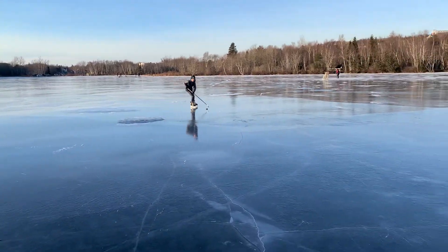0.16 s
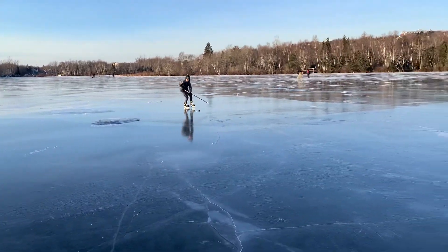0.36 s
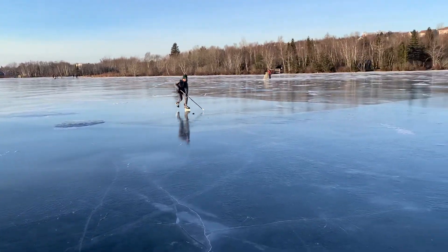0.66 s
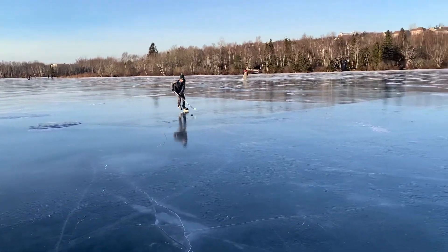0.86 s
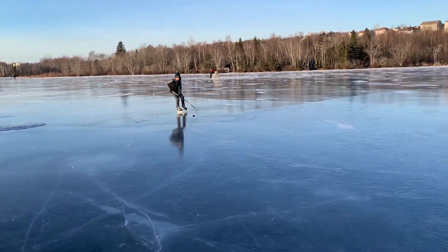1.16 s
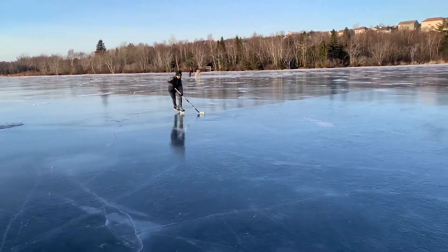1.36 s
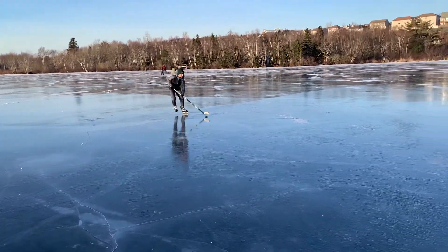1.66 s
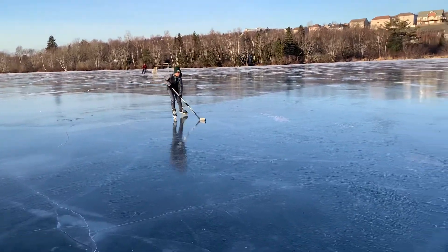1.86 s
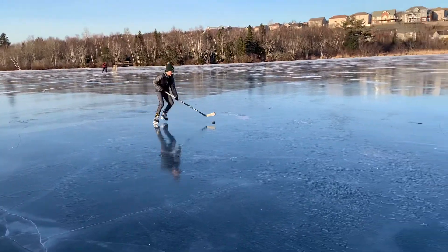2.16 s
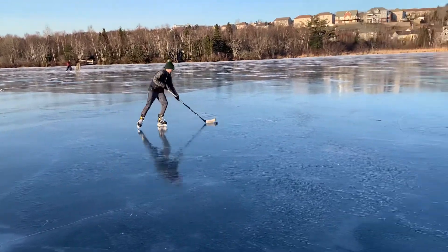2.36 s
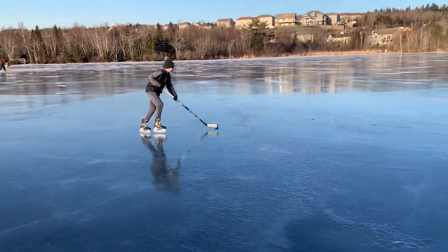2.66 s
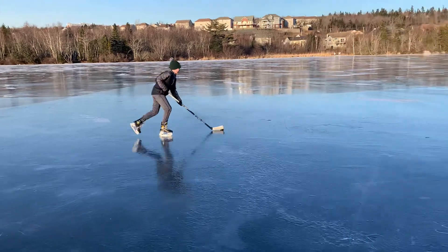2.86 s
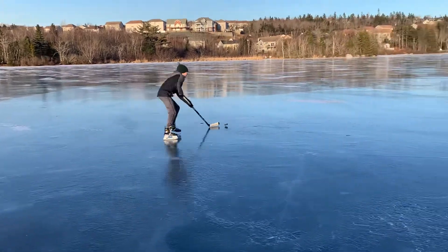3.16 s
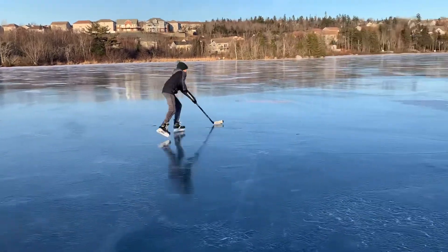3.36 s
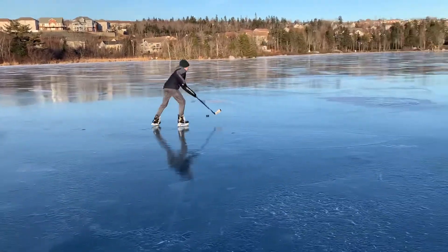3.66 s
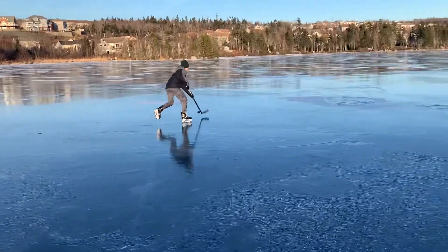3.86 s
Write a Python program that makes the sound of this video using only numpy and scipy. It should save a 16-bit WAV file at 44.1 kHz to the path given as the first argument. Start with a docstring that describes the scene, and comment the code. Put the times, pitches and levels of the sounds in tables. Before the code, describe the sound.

Ice skating on a frozen lake: quiet scraping at first, then stronger strokes, chipping snaps and hard hockey stick knocks as the skater nears; ice booms softly and light wind rumbles at the handheld microphone.

```python
"""A skater with a hockey stick passes close by on a frozen lake, under faint air and a light wind.
At first blades rasp and hiss stroke by stroke (fractures over shaving noise) and two early knocks sound.
From about 1.5 s the wind is stronger, and stick and puck knock in clusters (noise bursts, ringing modes).
The stick drags now and then in gritty slips; a strong knock near 2.8 s precedes the heaviest at 3.16 s.
Throughout, blades chip the ice in short snaps, and the sheet rumbles and booms in low sagging tones."""
import sys
import numpy as np
from scipy import signal
from scipy.fft import rfft, irfft
from scipy.io import wavfile
from scipy.ndimage import uniform_filter1d

SR = 44100
rng = np.random.default_rng(int(sys.argv[2]) if len(sys.argv) > 2 else 0)


def digitize_waveform(pressure):
    """Quantize a signal to 16-bit integers and store it at the path in sys.argv[1].

    Rows of a 2-D input are taken as channels; values are limited to [-1, 1].
    """
    field = np.atleast_2d(pressure).T
    bounded = np.clip(field, -1, 1)
    quanta = np.round(bounded * 32767).astype(np.int16)
    wavfile.write(sys.argv[1], SR, quanta)


N = 176400

# light wind: t/s, level/dB
WIND_LEVEL = [(0, -65.5), (.8, -65.5), (1.4, -55), (2.4, -55), (4, -54)]
# spectra of wind and open air: f/Hz, level/dB per Hz
WIND_SPECTRUM = [(10, -25), (25, -17), (40, -12), (55, 0), (85, -4.5), (130, -1), (250, -14.5), (600, -53),
                 (16000, -114)]
AIR_SPECTRUM = [(50, 16.5), (300, 8), (750, -6), (2000, -14), (4000, -9), (10000, 0), (16000, -5)]
AIR_DB = -65.5

# ice sheet booming under the skater's weight: t/s, level/dB, starting pitch f/Hz
BOOMS = [(0.044, -19, 133), (0.514, -26, 212), (0.808, -26, 134), (0.969, -24, 139), (1.36, -19, 195),
         (1.605, -35, 150), (1.884, -15, 168), (2.517, -19.5, 219), (2.571, -18, 173.6), (2.788, -12, 150),
         (3.224, -11, 150), (3.229, -20, 376), (3.395, -20, 156), (3.664, -20, 150)]
BOOM_RISE_S, BOOM_SAG_PER_S = 0.012, 2.6

# small clicks of blades chipping the ice: t/s, body level/dB, treble level/dB
CHIPS = [(0.076, -22.5, -22.5), (.321, -31.5, -25), (.526, -23, -23), (.706, -18, -18), (.783, -27.5, -36),
         (0.7963, -31, -36), (.976, -45, -34), (0.995, -21, -23), (1.053, -18.5, -17.5),
         (1.1222, -18.5, -18.5), (1.364, -12, -11.5), (1.389, -13.5, -15), (1.403, -16.5, -33),
         (1.437, -14, -14.5), (1.495, -16.5, -23), (1.5701, -10, -15.5), (1.65, -15.5, -19.5),
         (1.682, -14, -22), (1.711, -22, -20.5), (1.795, -20, -31), (1.821, -11, -23), (1.982, -20.5, -50),
         (2.081, -25.5, -37), (2.429, -18, -39), (2.566, -28, -34), (2.645, -36, -20), (2.922, -15.5, -29),
         (3.045, -11, -15), (3.14, -16.5, -24), (3.332, -22, -41), (3.494, -25, -22), (3.623, -20.5, -25),
         (3.683, -7, -25), (3.701, -18.5, -26), (3.724, -14, -20.5), (3.803, -45, -18.5), (3.848, -27, -23),
         (3.915, -16.5, -47), (3.9245, -12, -39)]
# spectra of a flake of ice and of a sharp crack: f/Hz, level/dB per Hz
CHIP_SPECTRUM = [(60, -4), (400, -5.5), (750, -0.5), (1200, 3.5), (1700, 1.5), (2500, 5.5), (3300, -3),
                 (5000, -8.5), (9000, -32), (16000, -60)]
CRACK_SPECTRUM = [(200, -88), (2500, -23.5), (5000, 1.5), (7000, 2.5), (9500, 3.5), (12000, -1),
                  (14000, -3), (16500, -14)]
CHIP_DECAY_S, CHIP_SNAP_DB = 0.0049, -8  # snap: first click against the crumbling that follows

# stick blade dragging over the ice: peak t/s, rise/s, fall/s, level/dB
DRAGS = [(1.475, 0.031, 0.024, -50), (1.54, 0.0058, 0.022, -53), (1.915, 0.069, 0.0073, -42.5),
         (2.77, 0.068, 0.14, -45), (3.325, 0.079, 0.068, -37)]
# spectrum of the drag: f/Hz, level/dB per Hz
DRAG_SPECTRUM = [(100, -18), (450, -6.5), (750, -3.5), (1020, -2.5), (1190, 3.5), (1350, 2), (1600, -5),
                 (2200, -4.5), (3000, -15), (5000, -28), (16000, -75)]
SLIPS_PER_S, SLIP_DB, SLIP_LAG_S = 520, -3.5, 0.00402

# stick and puck knocks: t/s, ice thump level/dB, thud level/dB, thud pitch f/Hz, stick ring level/dB,
# high ring level/dB, crack level/dB, ring length (share), bass lag/s
KNOCKS = [(0.25, -31, -10.5, 2110, -38, -21, -15, 0.18, 0.00091),
          (0.254, -35, -14.5, 1920, -21.5, -34, -25, 1.3, .001),
          (0.488, -48, -17.5, 1550, -32, -40, -40, 0.19, 0.00258),
          (1.5391, -30, -8, 1370, -8, -19.5, -22, 1.8, 0.0017),
          (1.5535, -38, -17, 1390, -17, -21, -27, 0.85, 0.0017),
          (1.582, -34, -10.5, 1370, -9, -14, -24, 0.56, 0.0011),
          (1.6128, -11, 3.5, 870, -2.5, -37, 2.5, 0.56, .002),
          (1.8604, -43, -4.5, 1670, 1.5, 2, -20, 0.53, 0.00102),
          (1.897, -22, -14, 1400, -2.5, -5, -13.5, 0.4, 0.0022),
          (1.8999, -22, -3, 970, -2, -10, -33, 0.36, 0.0019),
          (2.321, -37, 0.5, 1200, -3.5, -10.5, -11.5, 0.63, 0.0022),
          (2.331, -22, -14, 960, -26, -20, -20, 0.59, 0.0023),
          (2.4918, -46, -8.5, 1640, -38, -24, -29, 0.37, 0.0046),
          (2.67, -10.5, -1.5, 1580, -8, -20, -19, 0.35, .004),
          (2.73, -29, -2.5, 2030, -2.5, -7.5, -1, 1.4, 0.0017),
          (2.75, -13.5, -8.5, 1150, -30, -26, -21, 0.45, 0.0084),
          (2.7922, -15, 7.5, 1360, 3, -10, -5.5, 0.37, 0.00284),
          (2.808, -20, -5.5, 1090, -10.5, -31, -32, 0.65, 0.0025),
          (2.8689, -26, 5, 1400, -5, -14.5, -18.5, 0.096, .003),
          (3.1615, -22, 4.5, 1370, 7, 8.5, -8.5, .6, 0.0022),
          (3.172, -19, -15, 1510, -5.5, -4.5, -29, .4, 0.0014),
          (3.218, -18, -8, 1230, -25, -36, -31, 0.37, 0.012),
          (3.4764, -34, -18, 1710, -16, -39, -33, 0.28, 0.0019),
          (3.6612, -24, -7, 1470, -20, -27, -12.5, 0.37, 0.00389),
          (3.6814, -6.5, -9.5, 790, -19, -32, -13, .4, 0.0037)]
# modes of the stick blade: f/Hz, level/dB, t60/s before the ring length share
STICK_MODES = [(412, -14.5, 0.055), (534, -26.5, 0.062), (1062, -9.5, 0.11), (1208, -6.5, 0.084),
               (1235, -15, 0.039), (1534, -3.5, 0.047), (1753, -7, 0.063), (1964, -1.5, 0.032),
               (2090, 0, 0.033), (2440, 10.5, 0.011), (2953, 2.5, 0.055), (3604, 7.5, 0.029),
               (3860, 14, 0.01), (4676, -5, 0.018)]
HIGH_RING_HZ, MODE_SCATTER_DB, MODE_DETUNE = 2400, 3.5, 0.011
# spectrum of the puck's thud: f (multiple of its pitch), level/dB per Hz
THUD_SPECTRUM = [(.05, -44), (.2, -14.5), (.33, -7), (.6, -4), (1, 2.5), (1.25, -1), (1.6, -6.5),
                 (2.8, -19), (6, -54), (14, -69)]
THUD_DECAY_S, THUD_RATTLE_DB = 0.0037, -3  # a freely ringing stick also rattles on the puck
THUMP_HZ, THUMP_RISE_S = 150, 0.0031  # each thump lands at 0.94 to 1.3 times this pitch
SNAP_DB, CRACK_DECAY_S, CRACK_TAIL_DECAY_S, CRACK_TAIL_DB = -21.5, 0.001, 0.00093, 5.5
BUZZ_DB, BUZZ_DECAY_S = -3.5, 0.0054  # the stick blade rattles against the ice after a blow
LEAD_S, LEAD_DB = 0.00194, -22.5  # part of a knock races ahead through the ice

# blade strokes: peak t/s, rise/s, fall/s, then deep grind, rasp, hiss and ice rumble level/dB
STROKES = [(.08, 0.078, 0.11, -66, -54, -66, -53.5), (0.534, 0.043, 0.051, -55, -53, -45.5, -60),
           (.77, 0.42, 0.15, -72, -59.5, -59.5, -68), (1.04, 0.098, 0.069, -59.5, -54, -48, -58.5),
           (1.37, 0.072, 0.029, -50, -54, -44.5, -58), (1.58, 0.24, 0.41, -51.5, -47, -65, -49),
           (1.888, 0.082, 0.082, -52, -46, -77, -52), (2.08, 0.19, 0.27, -85, -54, -98, -57),
           (2.299, 0.059, 0.071, -44.5, -41.5, -50.5, -52.5), (2.419, 0.036, 0.023, -52, -45, -52, -59.5),
           (2.54, 0.047, 0.052, -45.5, -41, -43, -47), (2.76, 0.13, 0.14, -45.5, -44, -49.5, -45),
           (3.02, 0.18, 0.092, -47, -50, -57, -54), (3.309, 0.15, 0.12, -49, -44, -48, -44.5),
           (3.48, 0.13, 0.044, -51.5, -48, -48, -53), (3.688, 0.029, 0.045, -39.5, -44, -54, -41.5),
           (3.90, 0.66, 0.12, -52.5, -53.5, -63, -60)]
# spectra of the four stroke layers: f/Hz, level/dB per Hz
GRIND_SPECTRUM = [(60, -2), (200, -18), (430, -8), (700, -3), (1020, 1.5), (1200, 5.5), (1400, -10.5),
                  (1650, -8), (2300, -2), (4000, -17.5), (8000, 1), (16000, -16)]
RASP_SPECTRUM = [(100, -15), (400, -18.5), (750, -8), (1100, -5), (1350, -7), (1620, 6), (1900, -9.5),
                 (2150, -3), (2450, 2.5), (2750, 6), (3300, -0.5), (4200, -5.5), (6500, -5.5), (9000, -73),
                 (16000, -67)]
HISS_SPECTRUM = [(500, -33), (2500, -17), (4500, 0), (6500, 3), (7700, -36), (8600, 7), (9700, 10),
                 (11500, 6.5), (13500, 4.5), (15500, -2), (16500, -13.5)]
RUMBLE_SPECTRUM = [(20, -28), (70, -3.5), (105, -19), (135, 0), (180, -2.5), (230, -5), (320, -13.5),
                   (500, -5), (1200, -62.5), (16000, -77)]
GRAINS_PER_S, GRAIN_SPREAD_DB = 1100, 5
PATCH_DB, PATCH_FRAMES, PATCH_BINS = 4, 22, 5
# the blade's resonance shifts with the load on its edge
BLADE_HZ, BLADE_WIDTH_HZ, BLADE_DRIFT, BLADE_DB = 1655, 128, .05, -9.5
CRACKLE_PER_S, CRACKLE_DB, CRACKLE_SPREAD_DB = 130, -3.5, 3  # coarse flakes, against the rasp
SWELL_DB, SWELL_HZ = 1.6, 7.6  # the skater's weight shifts on the edge

# bending waves: pitches below this come later, by half the bass lag two octaves down
BEND_HZ = 2176
SHORE_DB, SHORE_T60_S = -16, 0.062

# where the skater is: t/s, left minus right level/dB
PAN = [(0, 1.5), (1.202, 2), (1.6, -0.5), (2.2, 1), (2.8, -0.3), (3.3, 0.3), (4, -0.4)]
# microphone pair, phase: f/Hz, lead of the left (radians)
PORT_PHASE = [(0, 0), (100, 0), (170, .4), (220, 1), (260, 1.7), (300, 3.1), (345, 4.3), (430, 5.1),
              (520, 6.3), (600, 7.8), (700, 10), (850, 12.2), (1080, 15), (1200, 17.8), (1400, 19.8),
              (1750, 19.3), (1950, 21), (2250, 20.6), (2500, 22.3), (2900, 22.6), (3400, 25.3),
              (3750, 27.2), (4300, 27.4), (5000, 28.6), (5600, 29.6), (6300, 31.4), (6800, 31),
              (7400, 29.2), (8700, 28.2), (10400, 25.2), (11500, 25), (13000, 22.2), (14200, 21.7),
              (15100, 18.9), (22050, 18.9)]
# microphone pair, balance: f/Hz, left minus right level/dB
PORT_BALANCE = [(60, 0), (300, 0), (430, .5), (630, -7), (900, -2), (1250, 0), (1500, -3), (2100, -4),
                (2900, -2), (3200, 2), (3700, -3), (5300, -6), (7000, 0), (16000, 0)]
# how far diffuse sound differs between the pair: f/Hz, amplitude share (0 to 1)
APART = [(60, .03), (200, .2), (300, .75), (420, .35), (700, .4), (1100, .45), (1500, .3), (1900, .5),
         (2600, .3), (3500, .5), (6000, .55), (8500, .1), (12000, .35), (13500, .1), (16000, .3)]
# microphone colour: f/Hz, level/dB
MIC = [(200, -0.5), (290, 1), (400, 2), (560, 1), (770, -2.5), (980, 0), (1600, 0), (2100, 0.5),
       (2550, -1.5), (3200, -1), (4300, -1.5), (6500, -2.5), (13000, -3.5), (16000, -3)]
LOW_CUT_HZ, EDGE_HZ = 27, 16200


def amp(db):
    """Decibels to gain."""
    return 10 ** (np.asarray(db) / 20)


def evened(x):
    """Scales to an rms of one."""
    return x / np.sqrt(np.mean(x ** 2) + 1e-20)


def unit(x):
    """Scales to an energy of one."""
    return x / np.sqrt(np.sum(x ** 2) + 1e-20)


def read(points, hz):
    """Reads a table on a log-frequency axis."""
    f, value = np.transpose(points)
    return np.interp(np.log(hz + 1), np.log(f + 1), value)


def add(mix, s, sound):
    """Adds a sound into the mix at time s."""
    part = mix[round(s * SR):][:len(sound)]
    part += sound[:len(part)]


def colour(x, points, size=4096):
    """Causal (minimum-phase) filter with the given spectrum."""
    log_gain = np.log(amp(read(points, abs(np.fft.fftfreq(size, 1 / SR)))))
    taps = np.fft.ifft(np.exp(np.conj(signal.hilbert(log_gain)))).real[:size // 2]
    return signal.fftconvolve(x, taps)[:len(x)]


def wander(rate_hz):
    """Random drift of rms one, rolling off above the given rate."""
    hz = np.fft.rfftfreq(N, 1 / SR)
    return evened(irfft(rfft(rng.standard_normal(N)) / np.sqrt(1 + (hz / rate_hz) ** 4), N))


def burst(t, decay_s):
    """A dying puff of noise."""
    return unit(rng.standard_normal(len(t)) * np.exp(-t / decay_s))


def sparse_signs(per_s):
    """Random moments at the given mean rate, each pushing up or down."""
    return rng.choice([-1, 1], N) * (rng.random(N) < per_s / SR)


def dispersed(x, lag_s):
    """Bending waves in the ice sheet: delay grows with one over the root of frequency."""
    hz = np.fft.rfftfreq(len(x), 1 / SR)
    delay = lag_s * np.maximum(np.sqrt(BEND_HZ / np.maximum(hz, 20)) - 1, 0) / 2
    turns = np.cumsum(delay) * hz[1]
    return irfft(rfft(x) * np.exp(-2j * np.pi * turns), len(x))


def air():
    """The faint hush of the lake, as steady coloured noise."""
    return amp(AIR_DB) * evened(colour(rng.standard_normal(N), AIR_SPECTRUM))


def wind():
    """Low buffeting at the microphones, as bass noise with a fluttering level."""
    level_db = np.interp(np.arange(N) / SR, *np.transpose(WIND_LEVEL))
    level = amp(level_db + 1.5 * wander(rate_hz=14))
    return level * evened(colour(rng.standard_normal(N), WIND_SPECTRUM))


def booms(size=8000):
    """Each boom swells softly and sags in pitch, as the slower bending waves arrive last."""
    out, t = np.zeros(N), np.arange(size) / SR
    for s, db, hz in BOOMS:
        turns = np.cumsum(hz * np.exp(-BOOM_SAG_PER_S * t)) / SR + rng.random()
        swell = t * np.exp(-t / BOOM_RISE_S)
        add(out, s, amp(db) * unit(swell * np.sin(2 * np.pi * turns)))
    return out


def patchy(x):
    """Random patches in time and frequency make the scrape's colour uneven."""
    z = signal.stft(x, nperseg=512, noverlap=384)[2]
    field = uniform_filter1d(rng.standard_normal(z.shape), size=PATCH_BINS, axis=0)
    field = uniform_filter1d(field, size=PATCH_FRAMES, axis=1)
    return signal.istft(z * amp(PATCH_DB * evened(field)), nperseg=512, noverlap=384)[1][:N]


def scrape(spectrum, chatter, grain_db, chatter_db):
    """Tiny fractures under an edge over a fine shaving noise, their level moved by its chatter."""
    size = amp(GRAIN_SPREAD_DB * np.minimum(rng.exponential(1, N), 5))
    grains = size * sparse_signs(GRAINS_PER_S)
    drive = rng.standard_normal(N) + amp(grain_db) * evened(grains)
    return evened(colour(patchy(drive * amp(chatter_db * chatter)), spectrum))


def chips(size=3000):
    """Short snaps where a blade lands or breaks out a flake of ice."""
    out, t = np.zeros(N), np.arange(size) / SR
    snap = amp(CHIP_SNAP_DB) * (t == 0)
    for s, body_db, treble_db in CHIPS:
        body = colour(snap + burst(t, CHIP_DECAY_S), CHIP_SPECTRUM)
        treble = colour(snap + burst(t, decay_s=0.0054), CRACK_SPECTRUM)
        add(out, s, amp(body_db) * unit(body) + amp(treble_db) * unit(treble))
    return out


def drags(chatter):
    """The stick blade judders over the ice in uneven slips and sounds its main resonance."""
    t, power = np.arange(N) / SR, 0
    for peak, rise, fall, db in DRAGS:
        away = (t - peak) / np.where(t < peak, rise, fall)
        power = power + amp(db) ** 2 * np.exp(-away ** 2)
    slips = rng.uniform(0.59, 1, N) * sparse_signs(SLIPS_PER_S)
    grit = evened(dispersed(colour(slips, DRAG_SPECTRUM), SLIP_LAG_S))
    rub = scrape(DRAG_SPECTRUM, chatter, grain_db=3, chatter_db=3.5)
    return np.sqrt(power) * evened(rub + amp(SLIP_DB) * grit)


def stick_modes(t, length):
    """A struck stick blade rings in decaying modes, with levels and pitches scattered blow by blow."""
    hz, db, t60 = np.transpose(STICK_MODES)[:, :, None]
    scatter, detune, phase = rng.standard_normal((3, len(hz), 1))
    level = amp(db + MODE_SCATTER_DB * scatter - 60 * t / (t60 * max(length, .1)))
    modes = level * np.sin(2 * np.pi * (hz * (1 + MODE_DETUNE * detune) * t + phase))
    modes *= 1 - np.exp(-t / 0.0017)  # soft onset
    high = hz[:, 0] > HIGH_RING_HZ
    return modes[~high].sum(0), modes[high].sum(0)


def puck_thud(t, pitch_hz, length, lag_s):
    """The puck's click and rattle, coloured around its pitch and smeared by the ice."""
    hit = (t == 0) + min(length, 1) * amp(THUD_RATTLE_DB) * burst(t, THUD_DECAY_S)
    return dispersed(colour(hit, np.multiply(THUD_SPECTRUM, [pitch_hz, 1])), lag_s)


def knocks(size=6000):
    """Each blow cracks, thuds, rings the stick blade and thumps the ice sheet."""
    out, t = np.zeros(N), np.arange(size) / SR
    for s, thump_db, thud_db, thud_hz, ring_db, high_db, crack_db, length, lag_s in KNOCKS:
        low_ring, high_ring = stick_modes(t, length)
        thump_hz = THUMP_HZ * rng.uniform(0.94, 1.3)
        thump = t * np.exp(-t / THUMP_RISE_S) * np.sin(2 * np.pi * thump_hz * t)
        thud = puck_thud(t, thud_hz, length, lag_s)
        crack = amp(SNAP_DB) * (t == 0) + burst(t, CRACK_DECAY_S)
        crack = crack + amp(CRACK_TAIL_DB) * burst(t, CRACK_TAIL_DECAY_S)
        crack = colour(crack, CRACK_SPECTRUM)
        buzz = colour(burst(t, BUZZ_DECAY_S), CHIP_SPECTRUM)
        ring = unit(low_ring) + amp(BUZZ_DB) * unit(buzz)
        add(out, s, amp(thump_db) * unit(thump) + amp(thud_db) * unit(thud)
            + amp(crack_db) * unit(crack) + amp(ring_db) * unit(ring)
            + amp(high_db) * unit(high_ring))
    return out


def stroke_levels():
    """Each stroke swells and fades; gives the gains of grind, rasp, hiss and rumble."""
    t, power = np.arange(N) / SR, 0
    for peak, rise, fall, *db in STROKES:
        away = (t - peak) / np.where(t < peak, rise, fall)
        power = power + amp(db)[:, None] ** 2 / (1 + away ** 2 / 2.71) ** 5.1
    return np.sqrt(power)


def blade_ring():
    """Friction sounds a resonance of the blade that drifts in pitch."""
    hz = BLADE_HZ * (1 + BLADE_DRIFT * wander(rate_hz=5.2))
    turn = np.exp(2j * np.pi * np.cumsum(hz) / SR)
    r = np.exp(-np.pi * BLADE_WIDTH_HZ / SR)
    # shift the noise down, smooth it with a double pole, then shift it back up
    smooth = signal.lfilter([1], np.poly([r, r]), rng.standard_normal(N) / turn)
    return evened((turn * smooth).real)


def crackle():
    """Coarse flakes break away under the edge."""
    size = amp(CRACKLE_SPREAD_DB * np.minimum(rng.exponential(1, N), 3))
    return evened(colour(size * sparse_signs(CRACKLE_PER_S), CHIP_SPECTRUM))


def skates(levels, chatter):
    """The scraping edges, with blade ring and flakes, and the ice sheet rumbling under them."""
    grind, rasp, hiss, rumble = levels
    swell = amp(SWELL_DB * wander(rate_hz=SWELL_HZ))
    edge = scrape(RASP_SPECTRUM, chatter, grain_db=-1.5, chatter_db=2.0)
    edge = edge + amp(BLADE_DB) * blade_ring() + amp(CRACKLE_DB) * crackle()
    return (grind * scrape(GRIND_SPECTRUM, chatter, grain_db=1.5, chatter_db=3.0)
            + swell * rasp * evened(edge)
            + swell * hiss * scrape(HISS_SPECTRUM, chatter, grain_db=-5.0, chatter_db=2.0)
            + rumble * scrape(RUMBLE_SPECTRUM, chatter, grain_db=1, chatter_db=-3.5))


def scattered(x, t60):
    """A diffuse tail of sound scattered over the open ice."""
    t = np.arange(SR) / SR
    tail = unit(rng.standard_normal(SR) * amp(-60 * t / t60))
    return signal.fftconvolve(x, tail)[:N]


def ports(direct, common, diffuse):
    """Two ports hear the sound with their own phase and level; diffuse sound differs between them."""
    hz = np.fft.rfftfreq(N, 1 / SR)
    apart = np.clip(read(APART, hz), 0, 1)
    tilt = amp(read(PORT_BALANCE, hz))
    both = rfft(direct) + np.sqrt(1 - apart ** 2) * rfft(common)
    side = apart * rfft(diffuse)
    lag = np.exp(-1j * np.interp(hz, *np.transpose(PORT_PHASE)))
    pair = np.array([tilt * (both + side), lag * (both - side)])
    return irfft(pair * np.sqrt(2 / (1 + tilt ** 2)), N)  # the tilt keeps the pair's power


def scene():
    """Knocks, chips, drags and strokes on the open lake, with wind and booming ice."""
    blows, levels, chatter = knocks(), stroke_levels(), wander(rate_hz=28.0)
    lead = np.roll(colour(blows, CHIP_SPECTRUM), -round(LEAD_S * SR))
    hits = blows + chips() + amp(LEAD_DB) * lead

    def bed():
        """Air, drags, strokes and scattered hits, drawn afresh at each call."""
        shore = amp(SHORE_DB) * scattered(hits, SHORE_T60_S)
        return air() + drags(chatter) + skates(levels, chatter) + shore

    common, diffuse = bed(), bed()
    near = amp(-5) * scattered(hits, t60=0.012)
    pan, still = np.interp(np.arange(N) / SR, *np.transpose(PAN)), np.zeros(N)
    skater = ports(hits, common, diffuse + near) * amp([pan / 2, -pan / 2])
    return skater + ports(booms() + wind(), still, still)


def record(dry):
    """The microphones' colour, then the recorder's bass cut and band limit."""
    dry = np.array([colour(channel, MIC) for channel in dry])
    bass_cut = signal.butter(4, LOW_CUT_HZ, "high", fs=SR, output="sos")
    dry = signal.sosfilt(bass_cut, dry)
    band_limit = signal.firwin(401, EDGE_HZ, window=("kaiser", 9), fs=SR)
    return signal.oaconvolve(dry, band_limit[None], "same")


dry = scene()
out = record(dry)
digitize_waveform(out)
```